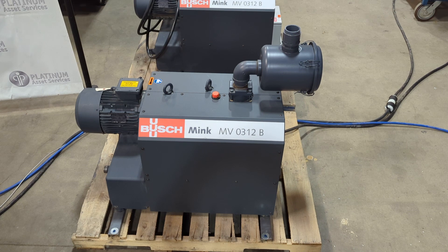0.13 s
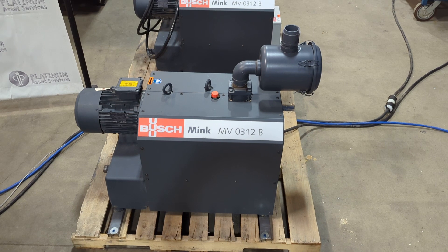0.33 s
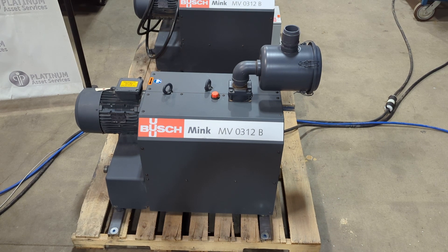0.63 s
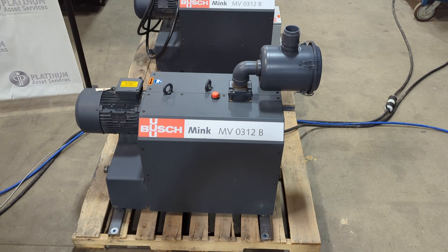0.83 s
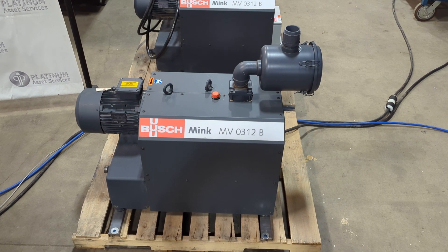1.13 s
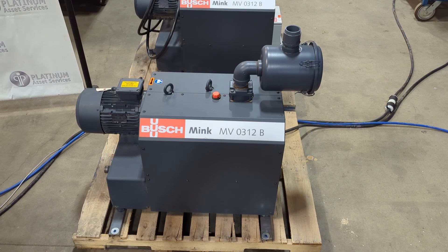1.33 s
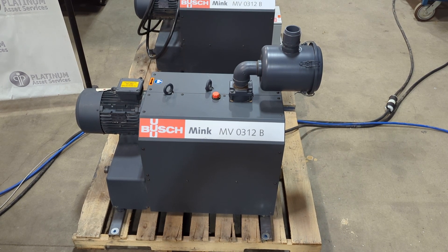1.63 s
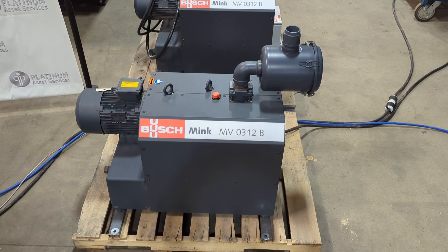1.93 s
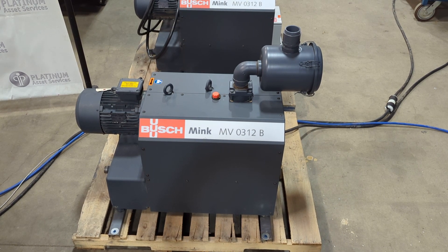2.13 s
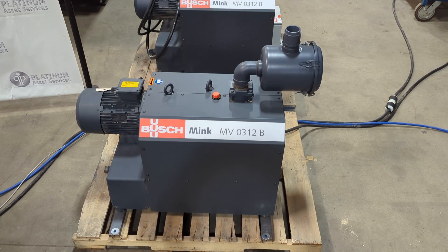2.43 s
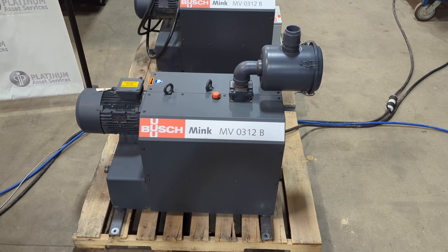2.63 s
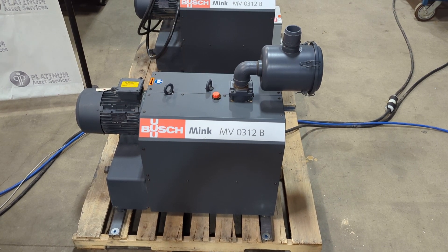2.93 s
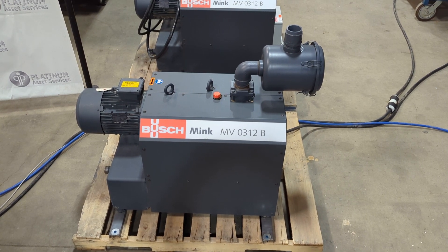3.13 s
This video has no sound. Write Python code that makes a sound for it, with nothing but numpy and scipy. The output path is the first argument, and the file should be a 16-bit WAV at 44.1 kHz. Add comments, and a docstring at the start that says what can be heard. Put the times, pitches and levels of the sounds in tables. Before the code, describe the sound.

A motor-driven vacuum pump runs steadily a metre or two away in a workshop hall. Its deep drone carries a higher metallic buzz, with rushing air and a faint hiss over the low rumble of the room.

```python
"""A claw vacuum pump runs steadily on a pallet in a workshop hall, a metre or two away.
Its rotors push out air twice per turn of the shaft. These strokes make a deep drone,
and the casing buzzes with their overtones (higher tones at whole multiples of the stroke rate).
Swirling air rushes in time with the strokes, the open inlet hisses, and the hall rumbles and hums."""
import sys
import numpy as np
from scipy import signal
from scipy.fft import rfft, irfft
from scipy.io import wavfile

SR = 44100
rng = np.random.default_rng(int(sys.argv[2]) if len(sys.argv) > 2 else 0)


def dump_mix(stems):
    """Bounce the given channels to the path in sys.argv[1] as a 16-bit WAV at rate SR."""
    frames = np.atleast_2d(stems).T  # one column per channel
    limited = np.clip(frames, -1, 1)  # hard clip at full scale
    pcm = np.round(limited * 32767).astype(np.int16)
    wavfile.write(sys.argv[1], SR, pcm)


N = 145089

STROKE_HZ, SPEED_WANDER = 117.37, .0005  # puffs of air a second, and the share by which that drifts
START_S = 0.0598  # silence before the sound fades in


def undb(db):
    """Turn decibels into a number to multiply a sound by."""
    return 10 ** (np.asarray(db) / 20)


def walk(rate_hz):
    """A smooth random wobble of typical size 1, mostly slower than rate_hz."""
    f = np.fft.rfftfreq(N, 1 / SR)
    wobble = irfft(rfft(rng.standard_normal(N)) * (f > 0) / (1 + (f / rate_hz) ** 2), N)
    return wobble / wobble.std()


def air():
    """Even stereo noise: part arrives straight, part bounces round the hall and is alike only in the bass."""
    bass_likeness, alike_below_hz = .985, 1020
    direct_share, right_lag_s = 0.23, 0.000377
    f = np.fft.rfftfreq(N, 1 / SR)
    alike = bass_likeness * np.exp(-(f / alike_below_hz) ** 2 / 2)
    common, apart, direct = rfft(rng.standard_normal((3, N)))
    common = common * np.sqrt((1 + alike) / 2)
    apart = apart * np.sqrt((1 - alike) / 2)
    bounced = np.array([common + apart, common - apart])
    direct = np.array([direct, direct * np.exp(-2j * np.pi * f * right_lag_s)])
    mix = np.sqrt(1 - direct_share) * bounced + np.sqrt(direct_share) * direct
    return irfft(mix, N) * np.sqrt(SR / 2)  # 0 dB in each 1 Hz band


def colour(sound, table):
    """Set how loud each frequency is; standing waves in the hall lift some and weaken others."""
    ripple_db, ripple_spacing_hz = 2.17, 14
    f = np.fft.rfftfreq(N, 1 / SR)
    hz, *sides = np.array(table, float).T
    db = np.array([np.interp(np.log(f + 1), np.log(hz), side) for side in sides])
    bumps = rng.standard_normal(size=4096)
    ripple = np.interp(f / ripple_spacing_hz, np.arange(len(bumps)), bumps)
    return irfft(rfft(sound) * undb(db + ripple_db * ripple), N)


def hall(t):
    """The motor and the hall rumble, with a few faint, wavering hums."""
    # steady pitches humming in the hall: f/Hz, level/dB
    hum_tones = [(193.8, -43), (301.5, -42), (750, -43)]
    # tone colour of the rumble: f/Hz, level/dB
    rumble_shape = [(20, -82), (33, -80), (43, -68), (56, -57), (80, -57), (130, -53), (165, -55.5),
                    (210, -54), (300, -58.5), (400, -58.5), (560, -58.5), (900, -68), (2000, -88)]
    rumble_db, waver_db = -1, 2.5
    hums = 0
    for hz, db in hum_tones:
        strength = undb(db + waver_db * walk(3.7))
        hums += strength * np.sqrt(2) * np.sin(2 * np.pi * hz * t + 0.87 * walk(6.5))
    return undb(rumble_db) * colour(air(), rumble_shape) + hums


def inlet_hiss(t):
    """Air sucked into the open inlet hisses, slowly growing louder."""
    # tone colour of the hiss: f/Hz, left level/dB, right level/dB
    hiss_shape = [(100, -110, -110), (2000, -70, -73), (3780, -67.5, -68.5), (4080, -61, -63),
                  (4200, -65.5, -62.5), (5500, -64.5, -64), (6700, -59.5, -65), (7570, -68.5, -69.5),
                  (7820, -64, -60.5), (8970, -66.5, -67), (9900, -69, -68.5), (10800, -71.5, -67),
                  (12000, -64.5, -65), (12500, -68, -68.5), (13200, -65, -64), (14000, -65.5, -66),
                  (15600, -70, -72.5)]
    gain_db, rise_db_per_s, flutter_db, grit_db = -0.5, 0.34, 0.66, 0.9
    db = gain_db + rise_db_per_s * (t - t.mean()) + flutter_db * walk(21) + grit_db * walk(220)
    return colour(air() * undb(db), hiss_shape)


def air_rush(t, angle):
    """Swirling air puffs as the pump's ports open and close, fluttering and swelling now and then."""
    # tone colour of air rushing through casing and silencer: f/Hz, left level/dB, right level/dB
    rush_shape = [(60, -105, -105), (348, -70, -73), (550, -60.5, -60.5), (710, -57.5, -56.5),
                  (887, -52.5, -48.5), (1290, -52.5, -49), (1640, -54, -50), (2000, -52, -54.5),
                  (2500, -50.5, -57), (2700, -47.5, -65), (2757, -52.5, -55.5), (2870, -65, -69),
                  (3117, -49.5, -66), (3330, -60, -58.5), (3690, -56.5, -71), (4060, -72, -74),
                  (6000, -96, -81)]
    # brief swells of the rushing air: t/s, half length/s, extra level/dB
    swells = [(0.17, 0.11, 2), (0.904, 0.023, 1.8), (1.365, 0.024, 1.3), (2.383, 0.027, 2),
              (2.73, .065, 2.5)]
    gain_db, puff_depth, flutter_db, grit_db = -0.5, 0.094, 0.72, 1.01
    puffs = 1 + puff_depth * (np.cos(2 * angle) + np.cos(3 * angle) + np.cos(5 * angle))
    swell_db = sum(db * np.exp(-((t - at) / half_length) ** 2) for at, half_length, db in swells)
    strength = undb(gain_db + swell_db + flutter_db * walk(24) + grit_db * walk(200))
    return colour(air() * puffs * strength, rush_shape)


def casing_buzz(angle):
    """The casing gives off overtones of the strokes, each wavering in the air flow."""
    # overtones of the casing: multiple of the stroke rate, left level/dB, right level/dB
    overtones = [(2, -44, -51.5), (3, -65, -43.5), (4, -48.5, -45.5), (5, -45, -47.5), (6, -40.5, -43),
                 (7, -26.5, -26), (8, -32, -26), (9, -31, -32), (10, -31, -30.5), (11, -50, -35),
                 (12, -36.5, -48), (13, -30, -24.5), (14, -29, -28.5), (15, -43, -35), (16, -35, -35),
                 (19, -38, -35), (21, -50, -43), (23, -28, -30.5), (27, -48, -49)]
    gain_db, waver_db, waver_rad = 1.5, 0.82, 0.13
    left_lag_s = 0.0002  # the buzz reaches the left side a little later
    lag = 2 * np.pi * STROKE_HZ * left_lag_s * np.array([[1], [0]])
    buzz = 0
    for multiple, left, right in overtones:
        phase = rng.uniform(0, 2 * np.pi) + waver_rad * walk(9.4)
        db = np.array([[left], [right]]) + gain_db + waver_db * walk(5.5)
        buzz += undb(db) * np.sqrt(2) * np.sin(multiple * (angle - lag) + phase)
    return buzz


def exhaust_drone(t, angle):
    """Each stroke pushes air out of the exhaust; the pushes blend into one deep tone."""
    gain_db, waver_db, fade_in_s, left_lag_rad = -19, .4, 0.03, 0.053
    fade_in = np.clip((t - START_S) / fade_in_s, 0, 1)
    wave = np.sqrt(2) * np.sin([angle - left_lag_rad, angle])
    return wave * fade_in * undb(gain_db + waver_db * walk(5.5))


def scene():
    """The pump runs at an almost constant speed in its hall."""
    # overall loudness, with a brief swell, a dip, then a slow rise: t/s, level/dB
    loudness_curve = [(.07, -1.5), (.14, 0.3), (.22, 0), (.3, -2.1), (.39, -3), (.8, -2), (1.3, -0.45),
                      (2.2, 0.26), (2.75, 1.2), (3.28, 1.5)]
    fade_in_s = 0.0085
    t = np.arange(N) / SR
    stroke_hz = STROKE_HZ * (1 + SPEED_WANDER * walk(5.6))
    angle = 2 * np.pi * np.cumsum(stroke_hz) / SR  # one full circle per stroke
    loudness = undb(np.interp(t, *np.array(loudness_curve).T))
    fade_in = np.clip((t - START_S) / fade_in_s, 0, 1)
    pump = exhaust_drone(t, angle) + casing_buzz(angle) + air_rush(t, angle) + inlet_hiss(t)
    return loudness * fade_in * (pump + hall(t))


def record(dry):
    """Cut away the very highest treble."""
    top_hz = 15750
    return signal.sosfilt(signal.ellip(10, .2, 80, top_hz, fs=SR, output="sos"), dry)


dry = scene()
out = record(dry)
dump_mix(out)
```